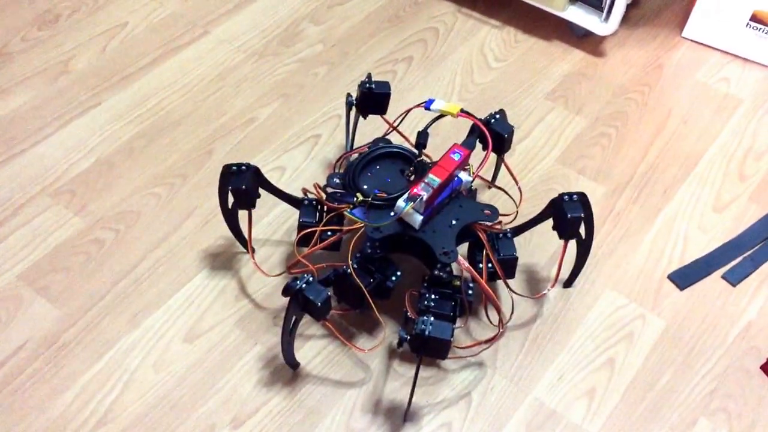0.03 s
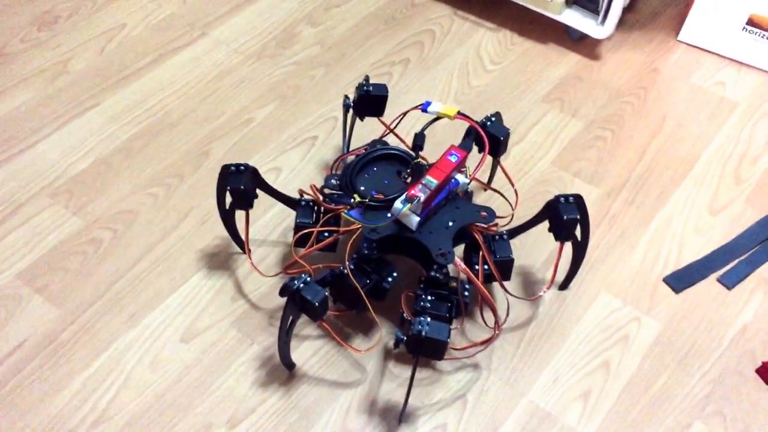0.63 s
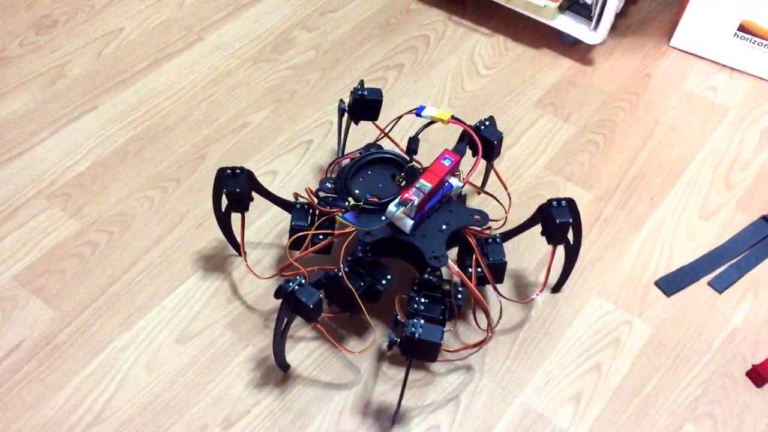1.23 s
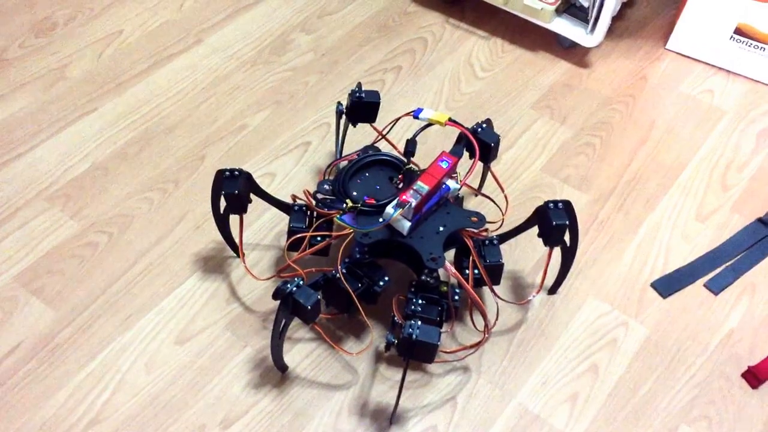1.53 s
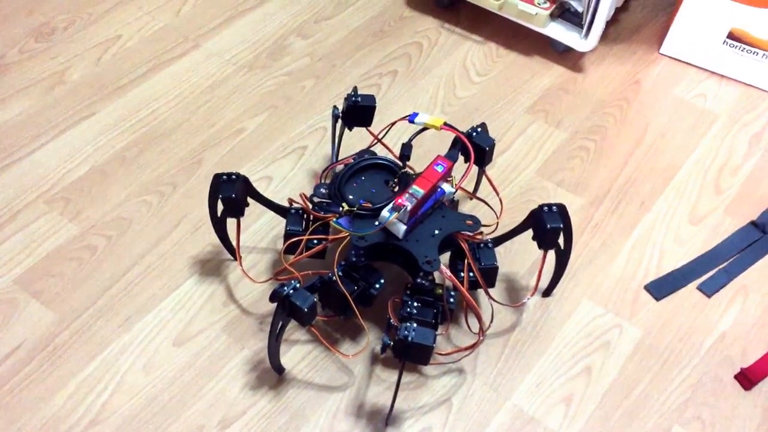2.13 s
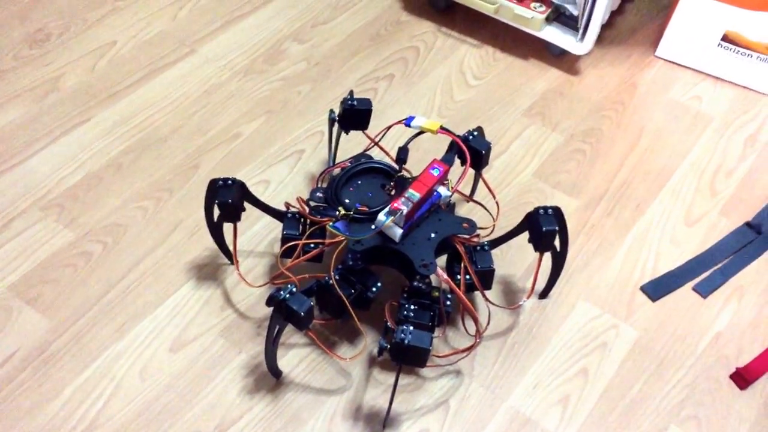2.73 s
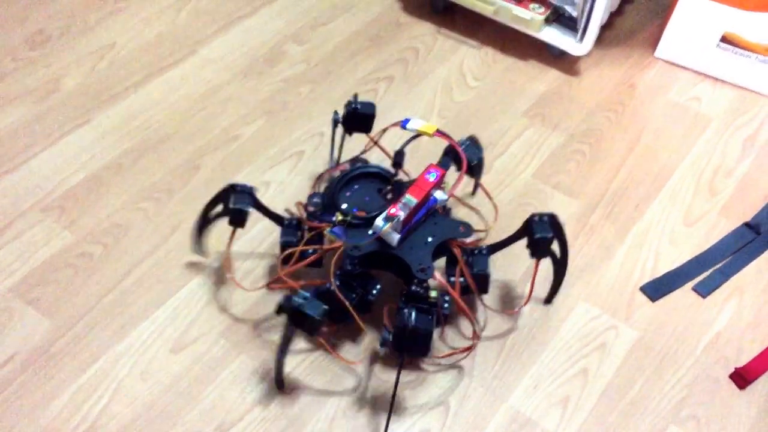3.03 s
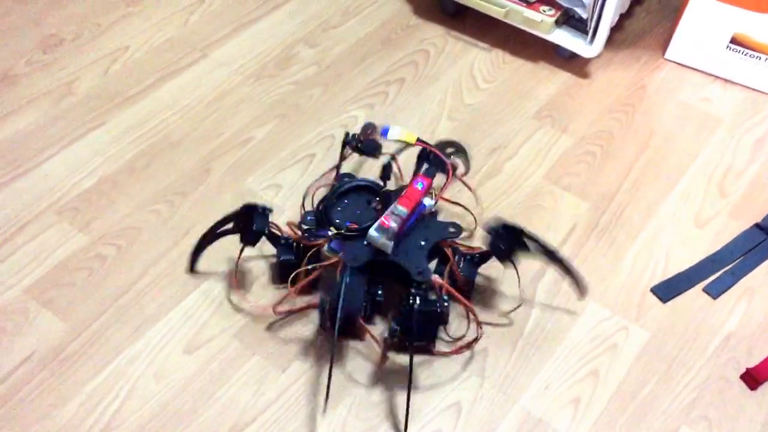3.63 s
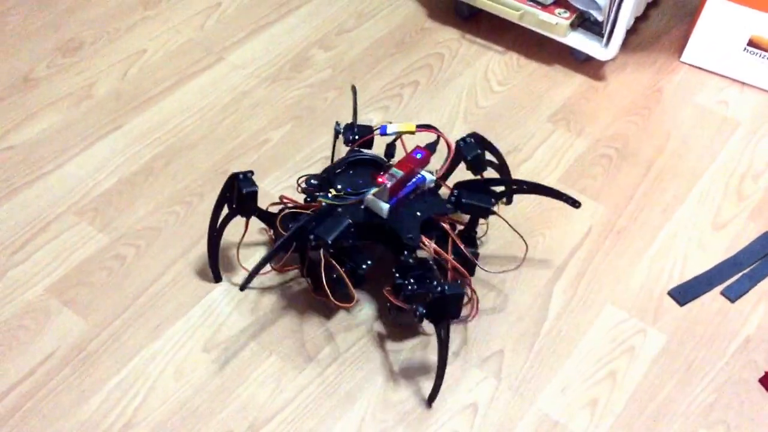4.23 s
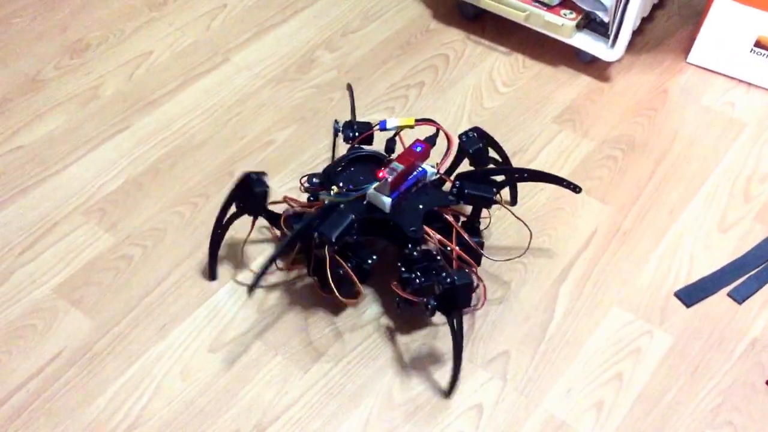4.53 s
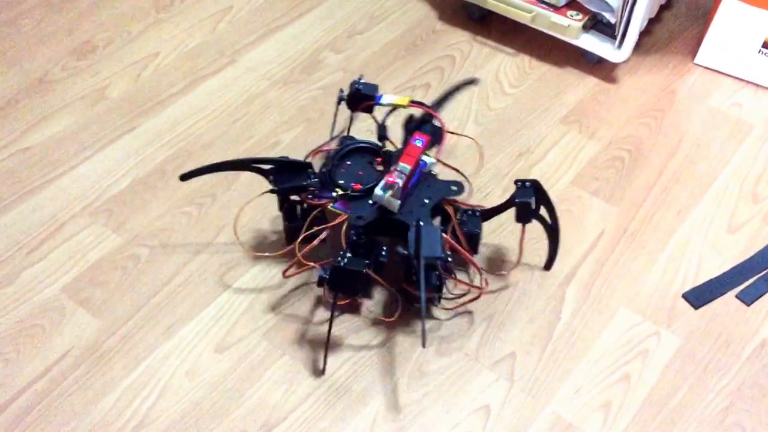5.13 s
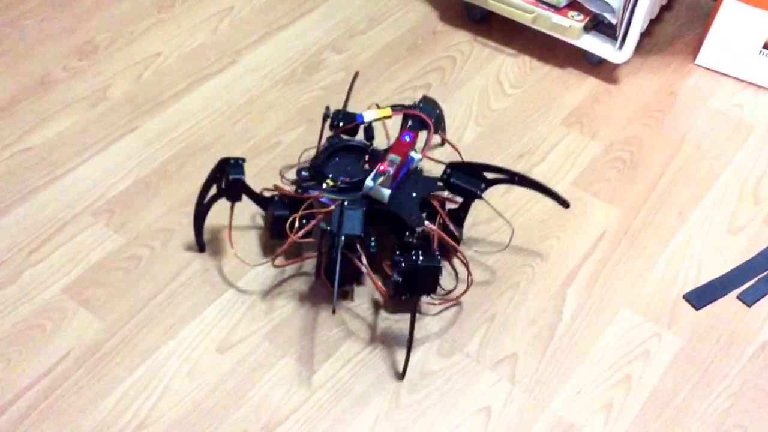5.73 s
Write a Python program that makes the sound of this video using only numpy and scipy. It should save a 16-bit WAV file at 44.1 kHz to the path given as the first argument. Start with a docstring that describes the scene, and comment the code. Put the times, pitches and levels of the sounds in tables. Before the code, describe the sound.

A small six-legged robot hums faintly, then walks with short motor whirrs and plastic feet clattering on a wooden floor.

```python
"""First you hear faint humming and ticking in a small quiet room: the servos (small geared motors)
of a six-legged robot are holding it up on a wooden floor. Then it walks, with six short whirrs of
gears and motor brushes, and three times a set of hard plastic feet clatters down. The boards knock,
the legs rattle, the room rings briefly, and a close microphone rounds off the loudest blows."""
import sys
import numpy as np
from scipy import signal
from scipy.fft import rfft, irfft, next_fast_len
from scipy.io import wavfile

SR = 44100
rng = np.random.default_rng(int(sys.argv[2]) if len(sys.argv) > 2 else 0)


def write(x):
    x = np.atleast_2d(x).T
    wavfile.write(sys.argv[1], SR, np.round(np.clip(x, -1, 1) * 32767).astype(np.int16))


N = 264159
TIME = np.arange(N) / SR
PULSE_HZ = 49.5  # control pulses sent to a servo each second


def amp(db):
    """Turn decibels into a number to multiply by."""
    return 10 ** (np.asarray(db) / 20)


def unit(x):
    """Scale a sound so that its average strength (rms) is 1."""
    return x / np.sqrt(np.mean(x ** 2))


def fade(t, t60):
    """Die away, losing 60 dB every t60 seconds."""
    return np.exp(-np.log(1000) * t / t60)


def spell(age, length, attack_s, t60):
    """Fade in, stay on, then die away after `length` seconds."""
    return np.clip(age / attack_s, 0, 1) * fade(np.maximum(age - length, 0), t60)


def wobble(t, rate):
    """A random curve, mostly within -1 to 1, that heads for a new value `rate` times a second."""
    knots = rng.standard_normal(2048)
    return np.interp(t * rate, np.arange(len(knots)), knots)


def clicks(times, sizes):
    """One-sample clicks at the given times."""
    return np.bincount(np.clip(np.round(times * SR).astype(int), 0, N - 1), sizes, N)


def colour(x, tone):
    """Filter a sound by a tone curve: rows of frequency in Hz, boost or cut in dB."""
    size = next_fast_len(2 * len(x), real=True)
    hz, db = np.transpose(tone)
    log_hz = np.log(np.maximum(np.fft.rfftfreq(size, 1 / SR), 1))
    bass_cut = 2 * np.maximum(np.log(hz[0]) - log_hz, 0)  # the bass falls away below the first row
    log_gain = np.log(amp(np.interp(log_hz, np.log(hz), db))) - bass_cut
    cepstrum = irfft(log_gain, size)
    cepstrum[1:size // 2] *= 2  # folded so the filter rings after a click, never before
    cepstrum[size // 2 + 1:] = 0
    return irfft(rfft(x, size) * np.exp(rfft(cepstrum)), size)[:len(x)]


def bursts(times, levels_db, t60, tone, tail_db, tail_t60):
    """Short bursts of filtered noise, each with a softer, longer tail, like small parts buzzing."""
    t = TIME[:SR // 2]
    decay = fade(t, t60) ** 2 + (amp(tail_db) * fade(t, tail_t60)) ** 2
    power = signal.fftconvolve(clicks(times, amp(levels_db) ** 2), decay)[:N]
    noise = rng.standard_normal(N)
    return colour(noise * np.sqrt(np.maximum(power, 0)), tone) / np.std(colour(noise[:SR], tone))


# The tone of the room's hiss. Each row: frequency in Hz, boost or cut in dB.
AIR_TONE = [(18, -37), (30, -7), (95, -4), (187, -8), (249, 1), (299, -12.5), (492, -18.5), (691, -17.5),
            (970, -19.5), (1680, -21.5), (2240, -21.5), (8280, -27.5), (10500, -30.5), (11900, -31),
            (15500, -33)]
# The electrical hum. Each row: pitch in Hz, level in dB.
ROOM_HUM = [(100, -74.5), (329, -88), (658, -86.5), (693, -90.5), (743, -90.5), (1388, -88.5), (1538, -88),
            (1685, -89.5)]


def quiet_room(air_db=-69):
    """Soft hiss and rumble with a faint electrical hum."""
    air = unit(colour(rng.standard_normal(N), AIR_TONE)) * amp(air_db + 0.32 * wobble(TIME, 5))
    hum = sum(amp(db + 0.5 * wobble(TIME, 7)) * np.sin(2 * np.pi * hz * TIME) for hz, db in ROOM_HUM)
    return air + np.sqrt(2) * hum


def with_echo(x, wet_db=-14, air_t60=0.18, boom_t60=0.29, boom_db=-7):
    """A small room adds a quick wash of echoes, in which the low middle notes last longest."""
    t = TIME[:SR // 2]
    air_tone = [(100, -2), (400, 0.5), (900, -14.5), (2000, 5.5), (4500, 5), (9000, 2.5), (15000, -8)]
    boom_tone = [(200, -2.5), (450, -3), (650, 3.5), (1000, -7), (2500, -10.5), (8000, -26.5)]
    air = colour(rng.standard_normal(len(t)), air_tone) * fade(t, air_t60)
    boom = colour(rng.standard_normal(len(t)), boom_tone) * fade(t, boom_t60)
    tail = (air + amp(boom_db) * boom) * np.clip(t / 0.002 - 1, 0, 1)  # echoes start after 2 ms
    return x + amp(wet_db) * signal.fftconvolve(x, tail / np.linalg.norm(tail))[:N]


# Faint squeaks while the robot stands. Each row: start in seconds, level in dB.
BRUSH_SQUEAKS = [(1.603, -74), (1.85, -76), (2.445, -71.5), (2.71, -75), (2.915, -77)]
# The tone of a squeak. Each row: frequency in Hz, boost or cut in dB.
SQUEAK_TONE = [(5500, -19), (7000, 0), (7600, -1), (8400, -6), (10000, -18)]


def squeaks():
    """A motor creeps part of a turn and its brush, a sliding electrical contact, chirps."""
    starts, db = np.transpose(BRUSH_SQUEAKS)
    return bursts(starts, db, t60=0.1, tone=SQUEAK_TONE, tail_db=-9, tail_t60=0.27)


# Single twitches of a servo. Each row: start in seconds, level in dB.
SERVO_TWITCHES = [(.034, -69), (0.067, -65.5), (.249, -64), (0.39, -60.5), (.471, -65), (0.672, -64),
                  (.713, -63), (.875, -66), (1.036, -60), (1.117, -65), (1.137, -66), (1.418, -67),
                  (1.606, -66)]
# The tone of the gear case's ping. Each row: frequency in Hz, boost or cut in dB.
PING_TONE = [(700, -22), (1100, -18), (1350, -5), (1600, -3), (1830, 2.5), (2100, -4), (2400, -16),
             (4000, -19), (9000, -40)]


def twitches():
    """A resting servo jerks against its gears and pings the case."""
    starts, db = np.transpose(SERVO_TWITCHES)
    return bursts(starts, db, t60=0.037, tone=PING_TONE, tail_db=-16, tail_t60=0.1)


# Brief whines. Each row: start in seconds, length in seconds, pitch in Hz, level in dB.
SERVO_WHINES = [(4.0, 0.084, 2435, -73), (4.098, 0.067, 2450, -50.5), (4.528, 0.29, 1474, -61.5)]


def whining(throb_db=3, waver=0.0304):
    """A servo hunting for its position whines unsteadily, throbbing with the control pulses."""
    out = 0
    for start_s, length, hz, db in SERVO_WHINES:
        phase = 2 * np.pi * np.cumsum(hz * (1 + waver * wobble(TIME, 250))) / SR
        out = out + amp(db) * spell(TIME - start_s, length, attack_s=0.036, t60=0.06) * np.sin(phase)
    return out * amp(throb_db * np.sin(2 * np.pi * PULSE_HZ * TIME))


# How hard the pulses nudge the motors. Each row: time in seconds, relative strength in dB.
TICK_STRENGTH = [(0, -70.5), (1.2, -69.5), (3.2, -69), (3.52, -62), (4.1, -63), (4.7, -62), (4.98, -55.5),
                 (5.1, -64.5), (5.5, -63.5), (5.99, -74)]
# The tone of a ticking servo case. Each row: frequency in Hz, boost or cut in dB.
CASE_TONE = [(500, -7), (700, -7), (1000, -10.5), (1350, -7.5), (1750, -4.5), (2100, -12), (2500, -16),
             (4000, -20), (9000, -32.5)]


def ticking(heavy_load_db=-62, ring_db=32, buzz_db=-4):
    """Each control pulse nudges the motors: the cases tick faintly, and sizzle under load."""
    pulses = np.arange(0.0145, N / SR, 1 / PULSE_HZ)
    force_db = np.interp(pulses, *np.transpose(TICK_STRENGTH)) + 1.2 * rng.standard_normal(len(pulses))
    ring = amp(ring_db) * colour(clicks(pulses, amp(force_db)), CASE_TONE)
    # three other servos tick in between, dropping back when the load is light
    others = np.add.outer(pulses, np.array([1, 2, 3]) / 4 / PULSE_HZ).ravel()
    others_db = np.repeat(force_db + np.minimum(force_db - heavy_load_db, 0), 3)
    starts, db = np.r_[pulses, others], np.r_[force_db + buzz_db, others_db]
    return ring + bursts(starts, db, t60=0.025, tone=CASE_TONE, tail_db=-13.5, tail_t60=0.08)


# Spells of humming. Each row: start in seconds, length in seconds, pitch in Hz, starting level in dB.
SERVO_HUMS = [(0, 0.48, 246, -69), (.32, 0.61, 247, -61), (1.115, 0.48, 248, -67), (1.408, .04, 237, -54.5),
              (1.469, 0.52, 249, -58.5), (2.153, 0.24, 246, -59.5), (2.426, 0.11, 246, -68.5),
              (2.576, .12, 249, -78), (2.861, .21, 246, -69), (3.389, .2, 245, -60),
              (4.085, 0.082, 234, -58), (4.523, 0.045, 236, -50), (4.585, 0.066, 252, -52),
              (4.858, 0.158, 243, -55.5), (5.011, 0.32, 248, -51), (5.332, 0.14, 228, -57),
              (5.471, .14, 248, -62)]


def humming(overtone_db=-24, flutter_db=1.5, waver=0.005, sag_db_per_s=11):
    """Servos holding up the body hum near one pitch, in spells that slowly ease off."""
    out, age = np.zeros(N + SR), TIME[:SR]
    for start_s, length, hz, db in SERVO_HUMS:
        phase = 2 * np.pi * np.cumsum(hz * (1 + waver * wobble(age, 35))) / SR
        hum = np.sqrt(2) * (np.sin(phase) + amp(overtone_db) * np.sin(3 * phase))
        level = amp(db - sag_db_per_s * age + flutter_db * wobble(age, 30))
        start = int(start_s * SR)
        out[start:start + SR] += hum * level * spell(age, length, attack_s=0.019, t60=0.12)
    return out[:N]


def run_up(age, lag_s):
    """A motor starting from rest grows louder with the square of its speed."""
    return (1 - np.exp(-np.maximum(age, 0) / lag_s)) ** 2


def gear_teeth(t, hz, tone, waver, scatter_db):
    """Five sets of gears click at wavering rates around `hz`; each tooth hits with its own force."""
    strikes = 0
    for gearing in np.linspace(-0.2, 0.2, 5):
        teeth_passed = np.cumsum(hz * np.exp(gearing + waver * wobble(t, 70))) / SR
        force = amp(scatter_db * rng.standard_normal(len(t)))
        strikes = strikes + np.diff(np.floor(teeth_passed), prepend=0) * force
    return unit(colour(strikes - np.mean(strikes), tone))


# The tones of the gear growl, the slow, heavily loaded hip gears, the fast, light knee gears,
# the gear rattle and the brush hiss. Each row: frequency in Hz, boost or cut in dB.
GROWL_TONE = [(150, -30.5), (330, -16), (460, -5), (630, 2), (830, -4), (1100, -5), (1400, -27.5),
              (1750, -25), (2600, -42)]
HIP_TONE = [(150, -26), (260, -9), (400, -2), (500, -9), (650, -14), (1200, -34.5)]
KNEE_TONE = [(800, -24), (1150, -4.5), (1370, 0), (1550, -18), (2200, -34.5)]
RATTLE_TONE = [(900, -19.5), (1700, -2), (2500, -2.5), (3100, -3.5), (3800, 0.5), (4700, -10), (6500, -22),
               (12000, -43.5)]
BRUSH_TONE = [(3500, -30.5), (4500, -13), (5150, -7), (5650, -1), (6300, 0), (7600, 0), (9700, -3),
              (10500, -10.5), (12000, -5), (15000, -12), (16000, -17.5)]
# Swings and follow-throughs of the legs. Each row: start, length, spin-up time and wait before the
# gears bite, all in seconds; growl, rattle and hiss levels in dB; hip and knee levels in dB compared
# with the growl; boost or cut of the hiss above 10 kHz in dB.
LEG_SWINGS = [(3.056, .15, 0.056, 0.0036, -33.5, -42, -36, -5, -21, -1),
              (3.207, .07, 0.013, .006, -38, -46.5, -43, -8, -9, 6),
              (3.596, .11, 0.044, 0.011, -26.5, -43, -36.5, -16.5, -24, 0),
              (4.072, 0.16, 0.056, 0.042, -35.5, -42.5, -45, -19, -4.5, -5.5),
              (4.256, .095, 0.012, 0.011, -44.5, -63.5, -51, -19, -20, -7),
              (4.598, 0.12, 0.054, .005, -29.5, -41.5, -34.5, -27, -19.5, 0),
              (5.041, .17, 0.049, 0.059, -36.5, -44, -40.5, -19.5, -10, -3.5),
              (5.243, 0.14, 0.041, .01, -50, -70.5, -73.5, -11, -21, -7),
              (5.59, 0.089, 0.038, .005, -30, -43, -36.5, -21.5, -24, -0.5)]


def leg_swing(start_s, length, spin_up, slack, growl_db, rattle_db, brush_db, hip_db, knee_db, top_db):
    """Brushes hiss as the motors spin up, gear teeth bite and growl ever faster, then it all fades."""
    full_speed_hz, gather_s, bite_s = 718.7, 0.05, 0.051
    start = int(start_s * SR)
    age = TIME[:min(int(0.7 * SR), N - start)]
    tooth_hz = full_speed_hz * (1 - 0.32 * np.exp(-age / gather_s))
    growl = gear_teeth(age, tooth_hz, GROWL_TONE, waver=0.06, scatter_db=4.5)
    hips = gear_teeth(age, 0.73 * tooth_hz, HIP_TONE, waver=0.05, scatter_db=3.5)
    knees = gear_teeth(age, 2 * tooth_hz, KNEE_TONE, waver=0.027, scatter_db=4)
    rattle = gear_teeth(age, tooth_hz, RATTLE_TONE, waver=0.11, scatter_db=3)
    sparks = rng.standard_normal(len(age)) * amp(2.9 * wobble(age, 1300) + wobble(age, 280))
    brush = unit(colour(sparks, [(hz, db + top_db * (hz > 10000)) for hz, db in BRUSH_TONE]))
    gears = growl + amp(hip_db) * hips + amp(knee_db) * knees
    loaded = gears * amp(growl_db + 2.5 * wobble(age, 50)) * run_up(age - slack, bite_s)
    spinning = (rattle * amp(rattle_db) + brush * amp(brush_db)) * run_up(age, spin_up)
    coasting = fade(np.maximum(age - length, 0), t60=0.23)
    return np.pad((loaded + spinning) * coasting, (start, N - start - len(age)))


# The body's weight drops onto the legs. Each row: start in seconds, relative level in dB.
BODY_DROPS = [(3.716, -30.5), (4.368, -39), (4.695, -23.5), (4.73, -15.5), (5.694, -33)]


def thumps(frame_hz=225, cut_hz=190):
    """The frame flexes briefly as it takes the weight; it is too small to give off deep bass."""
    starts, db = np.transpose(BODY_DROPS)
    t = TIME[:SR // 10]
    flex = np.sin(2 * np.pi * frame_hz * t) * fade(t, t60=0.05) * np.minimum(t * frame_hz, 1)
    flex = signal.sosfilt(signal.butter(2, cut_hz, "high", fs=SR, output="sos"), flex)
    return signal.fftconvolve(clicks(starts, amp(db)), flex)[:N]


# The floorboards' notes. Each row: pitch in Hz, relative level in dB, seconds to fade by 60 dB.
BOARD_NOTES = [(58, -46, 0.28), (74, -43.5, 0.44), (160, -37, 0.026), (225, -25, 0.043), (340, -26.5, 0.06),
               (433.8, -23, 0.065), (581, -12, 0.062), (653, -8.5, 0.076), (810, -18.5, 0.16),
               (909, -18, 0.064), (965, -13, .09), (1021, -13.5, 0.07), (1234, -27, 0.23),
               (1440, -27, 0.13), (1528, -27.5, 0.19), (1648, -26, 0.13)]


def knocks(blows, ring_db=0.5, overtone_db=-10, cut_hz=400):
    """A foot gives the floor one hard, short knock; the boards ring on differently at every spot."""
    t, out = TIME[:SR // 2], np.zeros(N + SR)
    note_hz, note_db, t60 = np.transpose(BOARD_NOTES)[:, :, None]
    build_up = np.sin(np.pi / 2 * np.minimum(t * note_hz / 2, 1)) ** 2  # takes two vibrations
    note_levels = amp(note_db) * fade(t, t60) * build_up
    bass_cut = signal.butter(2, cut_hz, "high", fs=SR, output="sos")  # a tiny foot makes little bass
    for start_s, db, hz, _, _ in blows:
        place, detune = rng.uniform(-0.86, 1, (2, len(BOARD_NOTES), 1))
        phases = 2 * np.pi * note_hz * (1 + 0.021 * detune) * t + np.pi * place
        ring = np.sum(note_levels * np.sin(phases), axis=0)
        knock = np.sin(2 * np.pi * hz * t) * fade(t, t60=0.026)
        knock += amp(overtone_db) * np.sin(2 * np.pi * 1.5 * hz * t) * fade(t, t60=0.015)
        start = int(start_s * SR)
        out[start:start + len(t)] += amp(db) * (signal.sosfilt(bass_cut, knock) + amp(ring_db) * ring)
    return out[:N]


# The tones of a plastic leg's clack and a foot tip's snap. Each row: frequency in Hz, boost or cut in dB.
CLACK_TONE = [(400, -19.5), (900, 4.5), (1500, 2), (2300, 2), (3100, 0.5), (4300, 1.5), (5200, -5),
              (6100, -6), (7000, -13.5), (11000, -23.5)]
SNAP_TONE = [(3000, -26), (5500, -1), (7000, 0.5), (9500, -2.5), (10500, -7), (13000, -9.5), (15000, -11),
             (16000, -21)]
# Blows of feet and joints. Each row: start in seconds, knock level in dB, knock pitch in Hz,
# clack level in dB, snap level in dB.
FOOT_BLOWS = [(3.2501, -52, 950, -25, -19.5), (3.2755, -32.5, 950, -36.5, -45),
              (3.7181, -2.5, 663, -16, -20), (3.729, -14.5, 754, -21, -22.5), (3.737, -9, 750, -11, -23),
              (3.742, -3.5, 747, -7, -18), (3.7544, -5, 790, -4, -15), (3.788, -12.5, 966, -12.5, -25.5),
              (4.367, -17, 738, -35.5, -58), (4.694, -16, 812, -39, -44), (4.7222, -15, 684, -32.5, -43.5),
              (4.7315, -5.5, 777, -9.5, -18.5), (4.7439, -8, 746, -12, -27),
              (4.758, -3.5, 747, -5.5, -15.5), (4.7648, -6.5, 687, -12, -17.5),
              (5.222, -30.5, 750, -43.5, -43.5), (5.6978, -2, 702, -16, -19),
              (5.7195, -6.5, 790, -11.5, -19.5), (5.7235, -10, 770, -13, -19), (5.74, -7.5, 964, -4, -16),
              (5.778, -9, 853, -10.5, -27)]


def footfalls():
    """Each blow knocks the boards, rattles the leg and snaps at the tip; landings add a thump."""
    starts, _, _, clack_db, snap_db = np.transpose(FOOT_BLOWS)
    clack = bursts(starts, clack_db, t60=0.053, tone=CLACK_TONE, tail_db=-9.5, tail_t60=0.16)
    snap = bursts(starts, snap_db, t60=0.0068, tone=SNAP_TONE, tail_db=-11.5, tail_t60=0.21)
    return knocks(FOOT_BLOWS) + thumps() + clack + snap


def scene():
    """The robot and the room around it, in one channel; only the walking sounds get an echo."""
    whirrs = sum(leg_swing(*row) for row in LEG_SWINGS)
    small_sounds = humming() + ticking() + twitches() + whining() + squeaks()
    return (with_echo(whirrs) + with_echo(footfalls()) + small_sounds + quiet_room())[None]


def record(dry):
    """The microphone rounds off the loudest peaks, then cuts the deepest bass and the highest treble."""
    ceiling, bottom_hz, top_hz = 0.72, 30, 15500
    rounded = dry / (1 + (dry / ceiling) ** 4) ** 0.25
    bass_trimmed = signal.sosfilt(signal.butter(2, bottom_hz, "high", fs=SR, output="sos"), rounded)
    return signal.sosfilt(signal.ellip(8, 0.2, 70, top_hz, fs=SR, output="sos"), bass_trimmed)


dry = scene()
out = record(dry)
write(out)
```